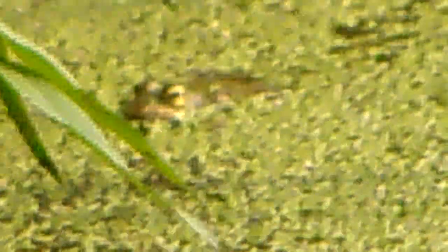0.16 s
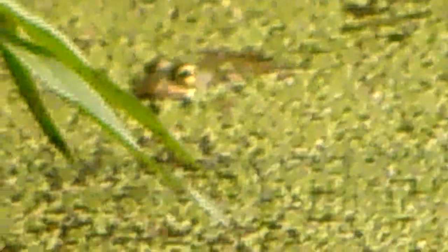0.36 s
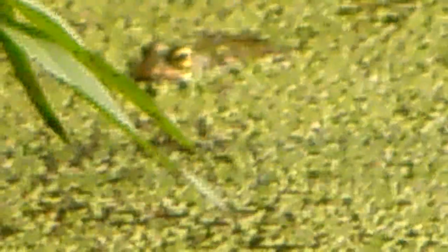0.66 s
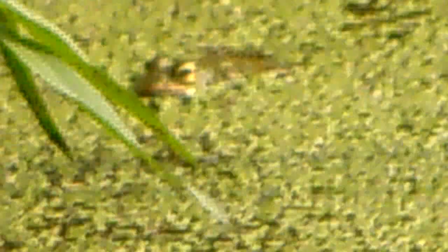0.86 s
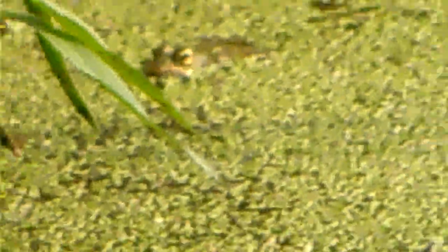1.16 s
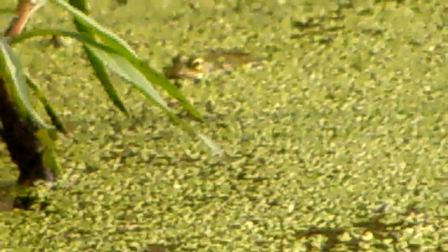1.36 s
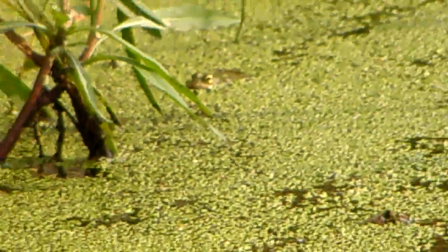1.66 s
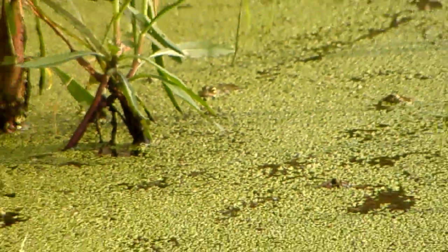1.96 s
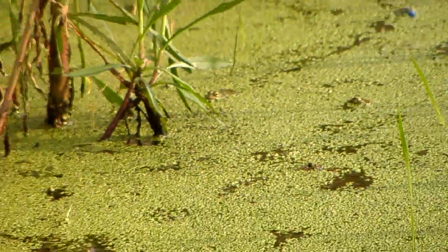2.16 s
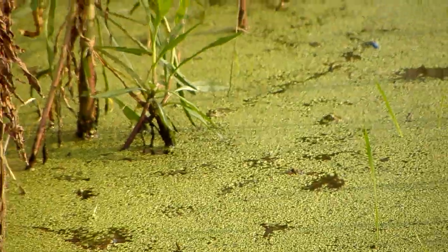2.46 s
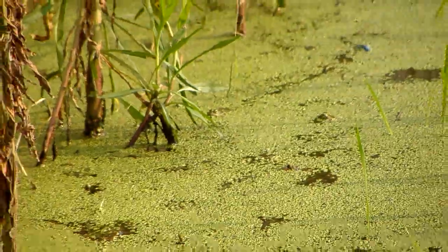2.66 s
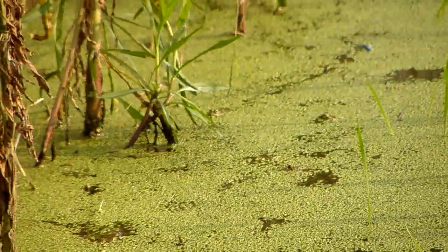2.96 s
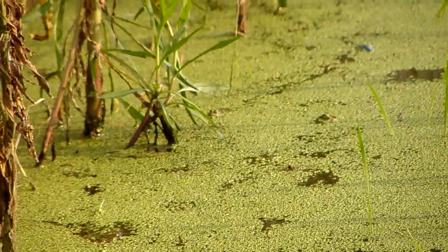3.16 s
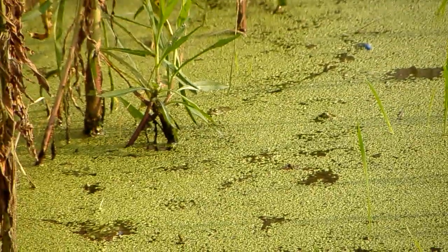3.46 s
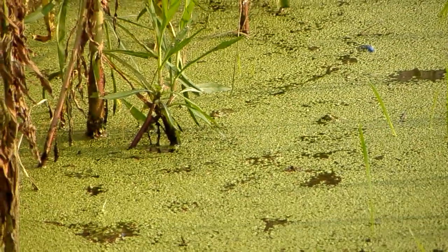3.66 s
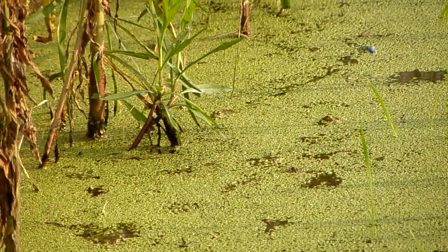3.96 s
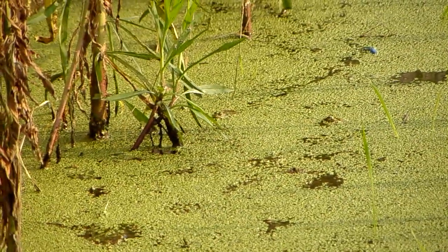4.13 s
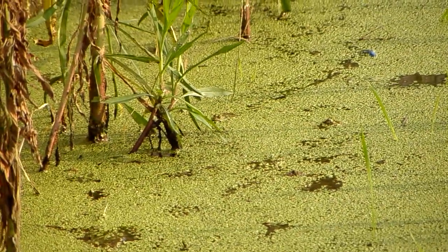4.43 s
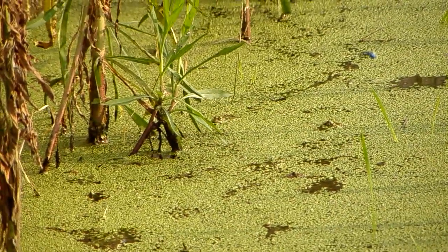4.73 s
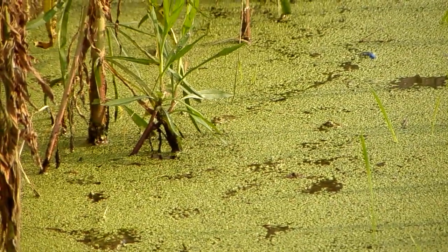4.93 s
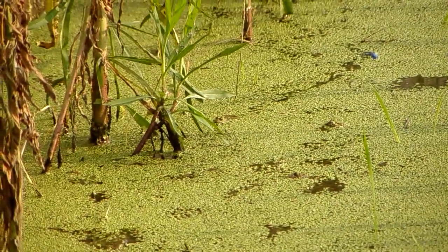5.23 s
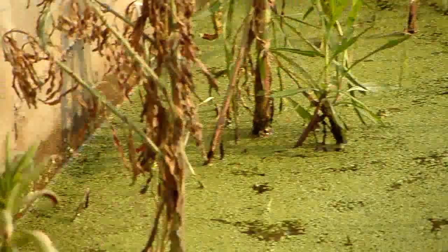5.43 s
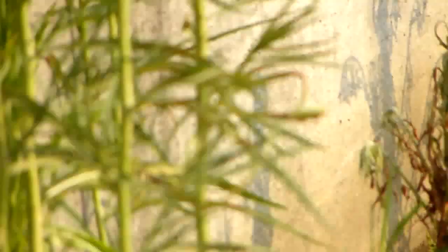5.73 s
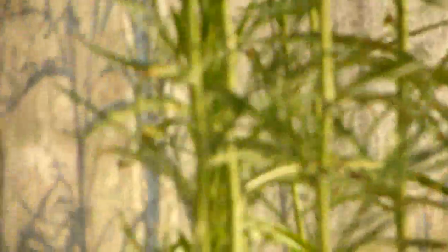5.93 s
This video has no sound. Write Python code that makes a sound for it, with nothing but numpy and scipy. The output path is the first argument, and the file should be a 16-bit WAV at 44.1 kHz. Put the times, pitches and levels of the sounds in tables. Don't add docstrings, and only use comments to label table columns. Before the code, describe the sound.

Quiet weedy pond: tail of a low croak, one weak grunt, a long pause with distant frogs fading, then two quick bright croaking trills.

```python
import sys
import numpy as np
from scipy import signal
from scipy.fft import rfft, irfft, next_fast_len
from scipy.io import wavfile
from scipy.ndimage import uniform_filter1d

SR = 44100
rng = np.random.default_rng(int(sys.argv[2]) if len(sys.argv) > 2 else 0)


def invert_db(x):
    u = np.asarray(x, float) / 20
    return 10 ** u


def unload_audio(sound):
    columns = np.transpose(np.atleast_2d(sound))
    steps = np.round(np.clip(columns, -1, 1) * 32767)
    wavfile.write(sys.argv[1], SR, steps.astype(np.int16))


N = 268524


def evened(x):
    return x / np.sqrt(np.mean(x ** 2) + 1e-20)


def read(points, hz):
    f, value = np.transpose(points)
    return np.interp(np.log(hz + 1), np.log(f + 1), value)


def add(mix, s, sound):
    sound = sound[max(-round(s * SR), 0):]
    part = mix[max(round(s * SR), 0):][:len(sound)]
    part += sound[:len(part)]


def coloured(x, tone, lead=((1, 0), (2, 0))):
    size = next_fast_len(N)
    hz = np.fft.rfftfreq(size, 1 / SR)
    response = invert_db(read(tone, hz)) * np.exp(1j * read(lead, hz))
    return irfft(rfft(x, size) * response, size)[..., :N]


def note(beats, voice, sac, body, rise_ms, loose_db, loose_pitch, sag, rasp_db):
    s, clicks, length, gap, power = beats
    peak_db, first_db, lull_db, last_db, sac_hz = voice
    n = int(round(clicks))
    slow = np.linspace(0, 1, n - 1) ** power
    gaps = gap + slow * (length - gap * (n - 1)) / slow.sum()
    at_ms = gap + np.r_[-gap, 0, np.cumsum(gaps)]

    knots = np.maximum.accumulate([0, 1, 2, n - 3, n - 2, n - 1])
    click_db = np.interp(np.arange(n), knots, [first_db, .3 * first_db, 0, lull_db, last_db, last_db])
    click_db = np.r_[first_db - 9, click_db]

    modes = np.array([(k * sac_hz, t60, d) for k, t60, d in sac] + body)
    sign = (-1.) ** np.arange(len(modes))[:, None]
    t, out = np.arange(1400) / SR, np.zeros(4500)
    rise = (1 - np.exp(-1000 * t / rise_ms)) ** 2
    chance = rng.standard_normal((12, 16, 2))
    for ms, db, luck in zip(at_ms, click_db, chance):
        rasp = np.diff(rng.standard_normal(len(t) + 1)) * invert_db(rasp_db - 60 * t / 0.0043)
        hz, t60, mode_db = modes.T[..., None]
        pitch_luck, level_luck = luck[:len(modes), :1], luck[:len(modes), 1:]
        hz = hz * (1 + loose_pitch * pitch_luck * 6.5 / t60 - sag * (ms / length - .4))
        decay = invert_db(mode_db + loose_db * level_luck - 60 * t / (t60 / 1000))
        rings = decay * np.sin(2 * np.pi * hz * t)
        add(out, ms / 1000, invert_db(db) * ((sign * rings).sum(0) + rasp) * rise)
    peak = abs(out[:round(5 * gap * SR / 1000)]).max()
    return s - .0004 - gap / 1000, invert_db(peak_db) * out / peak


def bright_frog():
    # t/s, peak level/dB, clicks, length/ms, lull level/dB
    trills = [
        [(3.6102, -27, 6, 25, -1.5), (3.6791, -15.5, 8, 23.5, -5), (3.7488, -15, 8, 27.5, -4),
         (3.8245, -13.5, 7, 23.7, -7), (3.895, -14.5, 8, 26.7, 0), (3.9686, -15.5, 8, 29, -1),
         (4.041, -19.5, 8, 30.8, -3)],
        [(4.224, -25, 7, 30.2, 2), (4.2893, -21, 7, 27.5, -.6), (4.3599, -15.5, 7, 25.9, -3),
         (4.4279, -12.5, 8, 28, -7), (4.5, -12.5, 9, 36, 0), (4.5744, -13.5, 7, 25.9, 0),
         (4.6434, -17, 8, 25.2, -4)],
    ]
    # factor on sac pitch, t60/ms, level/dB
    sac_modes = [(.72, 6.7, -4), (.92, 4.06, 4), (1.08, 9, 2.5)]
    # factor on sac pitch, t60/ms, level/dB
    taut_modes = [(1.13, 20.3, -12), (1.18, 16, -11)]
    # f/Hz, t60/ms, level/dB
    body_modes = [(576.6, 32.5, -23.5), (3370, 6.1, -11), (3900, 7.5, -16), (4500, 5, -18.5),
                  (5430, 5.4, -23.5), (7440, 4, -30), (9200, 3.5, -54), (10500, 2.7, -48.5),
                  (11800, 4.3, -45.5)]
    full_db = -15
    taut_hz, slack_hz, fill_notes = 2340, 560, 1.9
    out = np.zeros(N)
    for trill in trills:
        for place, (s, peak_db, clicks, length, lull_db) in enumerate(trill):
            soft_db = full_db - peak_db
            beats = s, clicks, length, 2.95 + .045 * soft_db, 2.8 + .13 * soft_db
            sac_hz = taut_hz - slack_hz * np.exp(-place / fill_notes)
            last_db = .5 - .7 * place
            voice = peak_db, -12, lull_db, last_db, sac_hz
            over_hz = max(7250 - 267 * place, 6050) - 1000 * (place == 0)
            over_db = -24 - 26.5 * np.exp(-place / 2.64)
            (hum_hz, hum_t60, hum_db), *upper = body_modes
            sac = sac_modes + [(k, ring, d - 0.34 * soft_db) for k, ring, d in taut_modes]
            body = [*upper, (over_hz, 13, over_db), (hum_hz, hum_t60, hum_db + 0.64 * soft_db)]
            add(out, *note(beats, voice, sac, body, rise_ms=0.46, loose_db=1.6,
                           loose_pitch=0.031, sag=0.02, rasp_db=-36))
    return out


def low_frog():
    # t/s, peak level/dB, clicks, length/ms
    low_notes = [
        (-0.0052, -24.5, 6, 21.5),
        (0.055, -23.5, 7, 22.5),
        (0.1156, -23, 8, 29),
        (0.1746, -23.5, 9, 34.2),
    ]
    # factor on sac pitch, t60/ms, level/dB
    sac_modes = [(.55, 5, -5), (.9, 6, 0), (1.1, 6, -2)]
    # f/Hz, t60/ms, level/dB
    body_modes = [(558, 22.6, -17.5), (2250, 5, -10.5), (3450, 6.8, -23), (4250, 14.4, -18),
                  (4540, 3.1, -12.5), (7400, 10, -49)]
    # f/Hz, t60/ms, level/dB
    grunt_modes = [(527, 45, -8), (3430, 5.2, -22), (4500, 5.2, -28)]
    sac_hz, sink_hz_per_s = 1673, 790
    out = np.zeros(N)
    for s, peak_db, clicks, length in low_notes:
        beats = s, clicks, length, 3.1, 3.3
        voice = peak_db, -8, .6, -.6, sac_hz - sink_hz_per_s * s
        add(out, *note(beats, voice, sac_modes, body_modes, rise_ms=0.46, loose_db=1.5,
                       loose_pitch=0.022, sag=0.048, rasp_db=-40.5))
    grunt_beats = 0.7555, 5, 28.2, 6, 4
    grunt_voice = -32.5, -3, -2, 1, 1670
    add(out, *note(grunt_beats, grunt_voice, sac_modes[1:], grunt_modes, rise_ms=.25, loose_db=2.8,
                   loose_pitch=0.033, sag=-.05, rasp_db=-29))
    return out


def banks(x, near_s, tail_db, near_db):
    # f/Hz, t60/s
    tail_t60 = [(300, 0.25), (1500, 0.35), (2200, 0.83), (2650, 2), (3200, 1.2), (4000, 0.88),
                (8000, 0.055)]
    taps = np.zeros((2, SR))
    at = np.arange(60, SR - 20, 20) + rng.integers(0, 20, (2, (SR - 61) // 20))
    np.put_along_axis(taps, at, rng.choice([-1., 1.], at.shape), 1)
    hz, t, z = signal.stft(taps, SR, nperseg=256)
    decay = invert_db(-60 * t / read(tail_t60, hz)[:, None])
    tail = signal.istft(z * decay, SR, nperseg=256)[1][:, :SR]
    near = taps * invert_db(-60 * np.arange(SR) / SR / near_s)
    echo = invert_db(tail_db) * tail / np.linalg.norm(tail[0])
    echo = echo + invert_db(near_db) * near / np.linalg.norm(near[0])
    return signal.fftconvolve(x[None], echo, axes=1)[:, :N]


def chorus(per_s=1500, spread_db=3.5, blur=1.0, apart=0.14, lag=4):
    # t/s, level/dB
    fade = [(0, -54.5), (1, -58), (2.8, -63), (4.2, -73.5), (6.09, -84.5)]
    # f/Hz, level/dB
    far_tone = [(200, -30.5), (330, -19), (600, -22.5), (1050, 2.5), (1300, 0), (1700, 5), (2050, 4),
                (2400, -8), (3200, -14.5), (5000, -41.5)]
    throb = invert_db(1.6 * evened(uniform_filter1d(rng.standard_normal(N), 1200)))
    clicks = (rng.random(N) < per_s / SR) * invert_db(spread_db * np.minimum(rng.exponential(1, N), 3))
    clicks = clicks * rng.choice([-1, 1], N)
    mid = evened(clicks * throb) + blur * rng.standard_normal(N)
    pair = np.array([mid, np.roll(mid, round(lag))]) + apart * rng.standard_normal((2, N))
    level_db = np.interp(np.arange(N) / SR, *np.transpose(fade)) + 3.0
    return invert_db(level_db) * evened(coloured(pair, far_tone)) * invert_db([[.5], [-.5]])


def birds():
    # t/s, length/s, start f/Hz, end f/Hz, level/dB
    chirps = [
        (0.68, 0.054, 4100, 3900, -64),
        (1.082, 0.04, 4250, 4070, -63),
        (1.086, 0.07, 3450, 3110, -60.5),
        (3.178, .03, 4770, 4500, -68),
    ]
    # t/s, length/s, start f/Hz, end f/Hz, level/dB
    whistles = [
        (.5, .2, 4960, 4960, -82),
        (1.62, .06, 3930, 3920, -76),
        (1.835, .075, 3600, 3600, -72),
        (1.95, .13, 4980, 4990, -82),
        (2.285, .15, 6230, 6230, -81),
        (2.44, .15, 6260, 6260, -83),
        (2.3, .13, 3880, 3880, -80),
        (2.44, .14, 3910, 3910, -80),
        (5.345, .085, 3400, 3260, -74),
    ]
    out = np.zeros(N)
    for rows, waver in ((chirps, .4), (whistles, .03)):
        for s, length, from_hz, to_hz, db in rows:
            hz = np.linspace(from_hz, to_hz, round(length * SR))
            hz = hz * (1 + waver * uniform_filter1d(rng.standard_normal(len(hz)), size=60))
            tone = np.sin(2 * np.pi * np.cumsum(hz) / SR)
            add(out, s, invert_db(db) * np.hanning(len(hz)) ** .5 * tone)
    return out


def air(patchy_db=0.65, swell_db=0.92):
    # f/Hz, level/dB
    air_tone = [(20, -68.5), (45, -50), (70, -46.5), (115, 6), (160, -8), (220, -7.5), (300, -11),
                (400, -13), (900, -16.5), (1300, -20), (1800, -25), (3500, -33.5), (7000, -46.5)]
    # f/Hz, correlation/1
    same_early = [(60, -.1), (110, .08), (155, .33), (220, .58), (330, .88), (880, .9), (1720, 1),
                  (3360, .08)]
    # f/Hz, correlation/1
    same_late = [(60, .78), (120, .88), (160, .62), (230, .7), (450, .82), (880, .85), (1720, 1),
                 (3360, .3)]
    frames, hz = N // 256 + 5, np.fft.rfftfreq(1024, 1 / SR)
    a, b, c, d, patches = rng.standard_normal((frames, 513, 5)).T
    swell = evened(uniform_filter1d(patches[0], 12))
    patches = evened(uniform_filter1d(uniform_filter1d(patches, 8, 0), 10, 1))
    late = np.clip((np.arange(frames) * 256 / SR - 1.8) / 0.81, 0, 1)
    same = np.outer(read(same_early, hz), 1 - late) + np.outer(read(same_late, hz), late)
    same = np.clip(same, -1, 1)
    lumps = 5 * np.outer(hz < 100, evened(uniform_filter1d(d[-1], 20)))
    left = a + 1j * b
    right = same * left + np.sqrt(1 - same ** 2) * (c + 1j * d)
    shape_db = read(air_tone, hz)[:, None] + patchy_db * patches + swell_db * swell + lumps
    z = np.array([left, right]) * invert_db(shape_db)
    wash = evened(signal.istft(z, nperseg=1024, noverlap=768)[1][:, :N])
    fade_db = -0.53 * np.arange(N) / SR
    return wash * invert_db(-50.5 + fade_db + np.array([[.9], [-.9]]))


def ticks():
    # t/s, peak level/dB, ring f/Hz, thump level/dB
    taps = [
        (0.061, -51, 2980, -32.5),
        (0.191, -62, 11500, -46),
        (0.489, -37.5, 1900, -70),
        (.813, -47.5, 4100, -42),
        (1.338, -62, 5000, -70),
        (2.192, -51, 12000, -34.5),
        (3.115, -58, 3500, -70.5),
        (3.215, -47.5, 2460, -70),
        (6.03, -57, 3980, -52),
    ]
    out, t = np.zeros(N), np.arange(3000) / SR
    for s, db, hz, thump_db in taps:
        grain = (hz / 9000) ** 2 * rng.standard_normal(len(t))
        crack = (grain + np.sin(2 * np.pi * hz * t)) * invert_db(db - 60 * t / 0.0059)
        thump = invert_db(thump_db - 60 * t / 0.049) * np.sin(2 * np.pi * 30 * t)
        add(out, s, crack + thump)
    return out


def hiss(shared=0.67):
    # f/Hz, level/dB
    hiss_tone = [(500, -16), (2500, -3.5), (5000, -1.5), (7000, -8), (10000, -2)]
    mid, side = rng.standard_normal((2, N))
    pair = np.array([shared * mid + side, shared * mid - side])
    return invert_db(-67.5) * evened(coloured(pair, hiss_tone))


def scene():
    # f/Hz, level/dB
    lean = [(500, 1.7), (1400, 2.3), (2400, 2.85), (3900, 0.33), (6500, 7.7)]
    # f/Hz, lead/rad
    lead = [(2000, 0.071), (4000, 0.54), (5000, 1.9), (6700, 1.3)]
    calls = bright_frog() + low_frog() + birds()
    direct = np.array([coloured(calls, lean, lead), calls]) + ticks() * invert_db([[1.5], [-1.5]])
    echoes = banks(calls, near_s=0.075, tail_db=-32.0, near_db=-18)
    return direct + echoes + chorus() + air() + hiss()


def thinned(x, edge_hz=7300, luck_db=5.0, off_db=-24):
    # f/Hz, level/dB
    threshold = [(7300, 8), (8300, 6), (8700, -5.5), (9800, -2), (10100, -1), (10600, 3), (10800, 22),
                 (13000, 20)]
    # t/s, length/s
    starved = [
        (3.666, 0.015),
        (4.562, 0.0099),
        (4.63, 0.0096),
    ]
    hz, t, z = signal.stft(x, SR, nperseg=1024)
    starts = np.arange(0, 513, 8)
    level_db = 10 * np.log10(np.add.reduceat((abs(z) ** 2).sum(0), starts) + 1e-20)
    luck = evened(uniform_filter1d(rng.standard_normal(level_db.shape), size=3, axis=1))
    over_db = level_db - np.median(level_db, 1)[:, None] + luck_db * luck
    on = (over_db > read(threshold, hz[starts])[:, None]).repeat(8, 0)[:513]
    on = on | (hz[:, None] < edge_hz)
    out = signal.istft(z * np.where(on, 1, invert_db(off_db)), SR, nperseg=1024)[1][:, :N]
    hole = np.zeros(N)
    for s, length in starved:
        add(hole, s, 1.04 * signal.windows.tukey(round(length * SR), .3))
    return out - hole * coloured(out, [(500, -11), (1200, 1.0)])


def grit(x):
    grit_hz, hold_s = 70, .06
    power = uniform_filter1d((x ** 2).mean(0), size=round(hold_s * SR))
    loud = np.tanh(np.sqrt(abs(power)) / invert_db(-29)) ** 2
    noise = coloured(rng.standard_normal((2, N)), [(grit_hz, 0), (3.1 * grit_hz, -30)])
    return invert_db(-59) * loud * evened(noise)


def top_cut(x):
    return signal.sosfilt(signal.butter(12, 12700, fs=SR, output="sos"), x)


def record(dry):
    # f/Hz, level/dB
    mic = [(3, -35.5), (22, -8.5), (60, 0.5), (6800, 0.5), (7400, -7), (8000, -39.5), (8500, -8),
           (9300, -5), (10500, -5.5), (11200, -22.5), (12400, -11), (13000, -25), (16000, -60)]
    bent = dry + 0.16 * dry ** 2 - 0.68 * dry ** 3
    heard = coloured(bent, mic)
    return top_cut(thinned(heard + grit(heard)))


dry = scene()
out = record(dry)
unload_audio(out)
```